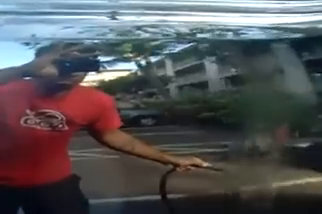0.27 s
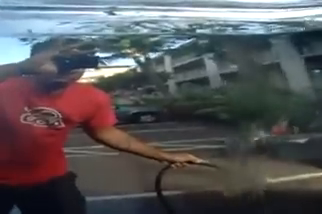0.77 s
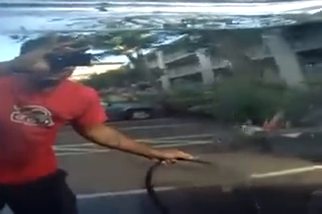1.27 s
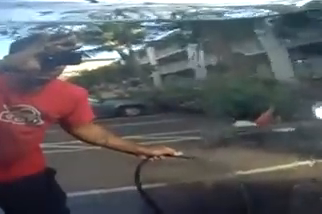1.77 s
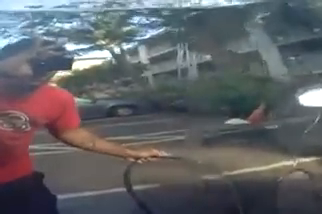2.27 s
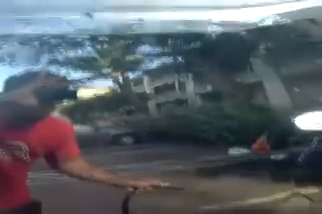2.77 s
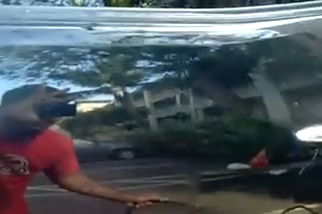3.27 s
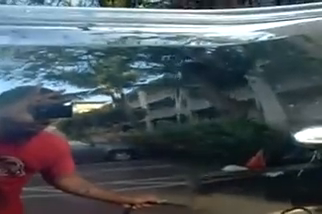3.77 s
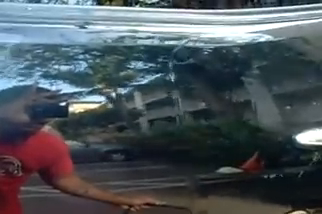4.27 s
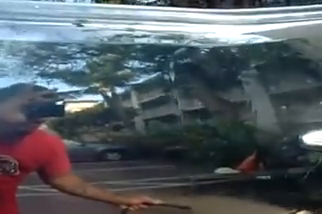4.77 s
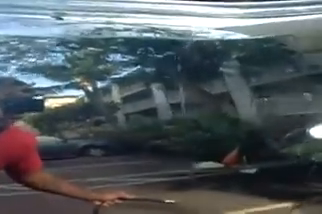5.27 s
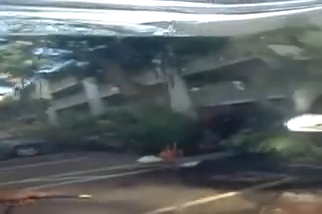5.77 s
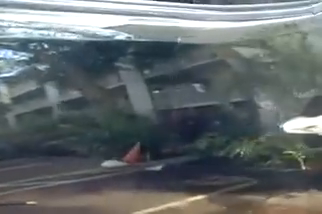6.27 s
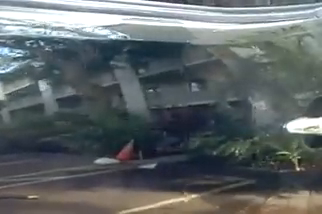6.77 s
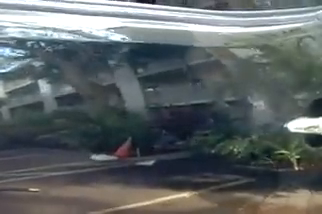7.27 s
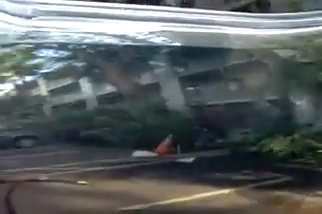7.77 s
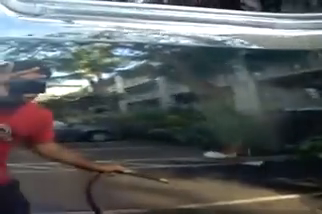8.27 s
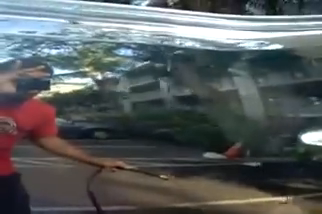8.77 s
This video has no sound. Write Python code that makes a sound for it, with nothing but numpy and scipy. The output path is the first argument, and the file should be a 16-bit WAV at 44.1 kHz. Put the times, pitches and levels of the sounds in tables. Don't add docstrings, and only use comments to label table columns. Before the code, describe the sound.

Fat water drops splat and plink crisply on wet asphalt beside a car panel, thinning midway then returning harder, over faint far traffic and wind thumps.

```python
import sys
import numpy as np
from scipy import signal
from scipy.fft import rfft, irfft, next_fast_len
from scipy.io import wavfile
from scipy.ndimage import map_coordinates

SR = 44100
rng = np.random.default_rng(int(sys.argv[2]) if len(sys.argv) > 2 else 0)


def field_ratio(decibels):
    return 10 ** (np.asarray(decibels, dtype=float) / 20)


def store_pcm(level_fs):
    pcm = np.round(np.clip(level_fs, -1, 1) * 32767).astype(np.int16)
    wavfile.write(sys.argv[1], SR, np.atleast_2d(pcm).T)


N = 397341

# (time [s], rumble level [dB], tyre roar level [dB])
TRAFFIC_LEVELS = [
    (0.0, -37.5, -40),
    (0.45, -44.5, -42.5),
    (4.44, -40.5, -43),
    (7.0, -43.5, -40),
    (7.58, -39, -41),
    (9.01, -41, -42),
]
# (frequency [Hz], level [dB])
TOWN_SPECTRUM = [(13, -41.5), (22, 0), (118, -0.5), (144, -4.5), (283, -6), (306, -5.5), (412, -6.5),
                 (966, -15.5), (1300, -20), (2500, -33), (3250, -41), (5500, -120)]
# (frequency [Hz], level [dB], half width [Hz])
PLANT_HUM = [
    (119.8, -49.5, 5.7),
    (174.7, -49.5, 4.5),
]
# (time [s], half length [s], frequency [Hz], width [Hz], level [dB])
PASSING_VEHICLES = [
    (.3, 0.71, 550, 39.4, -46),
    (3.053, 0.24, 680, 510, -45.5),
    (5.772, 0.17, 177, 24.7, -42),
    (6.7, 0.16, 460, 25, -48),
    (7.313, 0.34, 895, 302, -48),
    (3.054, .25, 980, 70, -55),
    (3.11, 0.23, 740, 59.6, -46.5),
]
# (time of peak [s], level [dB], pitch [Hz], swell [dB/s], fade [dB/s])
MOTOR_WHINES = [
    (.9, -51, 328, 12, 13),
    (6.699, -39, 343.4, 7.5, 34),
    (7.22, -49.5, 345, 50, 26.0),
]
# (time [s], half length [s], level [dB])
WIND_GUSTS = [
    (0.0, .03, -27),
    (0.16, 0.049, -29),
    (0.34, .05, -32),
    (7.154, 0.43, -40.5),
    (7.735, 0.32, -36),
    (8.218, 0.13, -38.5),
    (8.573, 0.15, -41),
    (8.92, 0.23, -47),
]
# (time [s], level [dB], pitch [Hz])
WIND_BUFFETS = [(.001, -21, 193), (.009, -15, 314), (.11, -26, 122), (0.132, -13.5, 150),
                (.146, -15.5, 232), (0.165, -14, 215), (.172, -20.5, 141), (0.317, -22.5, 190),
                (0.328, -23.5, 119), (7.543, -18, 160), (7.65, -30, 140), (7.746, -26, 155),
                (7.826, -15, 116), (7.875, -24, 160), (8.171, -21, 105), (8.319, -24.5, 120),
                (8.581, -25.5, 100)]
# (time [s], patter level [dB], jet hiss level [dB])
WATER_FLOW = [(0.0, -48.5, -59), (0.55, -50, -65), (0.85, -53, -62.5), (1.3, -47, -58),
              (1.58, -47.5, -60.5), (2.25, -52.5, -60), (2.5, -55, -72), (3.81, -54, -69), (4.04, -59, -73),
              (5.0, -66, -70), (5.29, -51.5, -62), (5.75, -57.5, -70.5), (6.0, -56, -61.5), (7.3, -50, -68),
              (8.1, -52, -59.5), (8.5, -56, -59), (8.66, -50.5, -62), (9.01, -50, -59)]
# (frequency [Hz], level [dB])
JET_SPECTRUM = [(880, -46), (1500, -4.5), (2040, -4.5), (3120, -2.5), (3580, -8), (3880, -3), (4460, -7.5),
                (8330, -32), (10500, -56.5), (13600, -67), (22000, -120)]
# (time [s], delay [ms])
DOOR_DELAY = [(0, 1.03), (.7, 1.02), (1.2, 1.11), (1.9, 1.13), (2.6, 1.28), (3.6, 1.28), (5, 1.19),
              (6, 1.18), (6.3, 1.25), (6.9, 1.21), (7.6, 1.29), (8.4, 1.24), (9.01, 1.28)]
# (time [s], length [s], start pitch [Hz], end pitch [Hz], level [dB])
PUDDLE_TRICKLES = [
    (6.42, .08, 4700, 4600, -45),
    (6.48, .09, 3400, 3700, -44),
    (6.94, .07, 3400, 3900, -44),
    (8.0, .05, 3800, 4000, -41),
    (8.16, .05, 4700, 4500, -43),
    (8.215, .08, 3700, 3250, -41),
]
# (time [s], peak level
# [dB], cavity pitch [Hz], ring [cycles])
FAT_RUNOFF_DROPS = [(0.0807, -21.5, 3420, 7.5), (0.1562, -23, 4220, 14), (0.3252, -24.5, 3900, 14),
                    (0.3399, -19, 3060, 20), (0.3534, -20.5, 3060, 17), (0.468, -24.5, 3900, 15),
                    (0.6564, -19, 3030, 6.3), (0.6731, -13.5, 2540, 4.7), (0.6983, -23.5, 3080, 11),
                    (0.9584, -22.5, 3500, 14), (0.9823, -17.5, 3740, 15), (1.0186, -16, 3470, 9.7),
                    (1.04, -15, 2800, 11), (1.067, -12, 2750, 5.7), (1.1772, -20, 3900, 18),
                    (1.3543, -24.5, 3970, 18), (1.4076, -19.5, 3430, 8), (1.49, -20.5, 3300, 12),
                    (1.5833, -23, 3900, 19), (1.6245, -22.5, 3400, 19), (1.6575, -11, 1660, 4.7),
                    (1.6814, -17.5, 3920, 12), (1.7275, -19.5, 3460, 9.8), (1.777, -19, 3560, 26),
                    (1.8412, -20.5, 3550, 10), (1.8654, -12, 3880, 7.1), (1.9148, -17.5, 3500, 12),
                    (1.9838, -23, 3540, 14), (1.9969, -21.5, 2410, 5.1), (2.014, -18.5, 4300, 12),
                    (2.11, -27, 3960, 13), (2.2044, -19, 3200, 6.5), (2.246, -24, 3380, 6.2), (2.275, -27, 3470, 8.9),
         (2.587, -28.5, 4060, 8.1), (3.4355, -30.5, 3180, 4.3), (3.689, -31.5, 4000, 11),
         (4.358, -28, 3980, 13), (4.4388, -30.5, 3200, 13), (4.559, -28.5, 4230, 8.3),
         (4.6785, -31, 3410, 14), (4.8526, -33.5, 1640, 17), (4.8836, -35.5, 2010, 31),
         (4.9105, -31, 3400, 11), (5.1316, -19.5, 1950, 5.9), (5.1754, -29.5, 3360, 11),
         (5.4119, -20, 1850, 5.4), (5.45, -22.5, 2600, 8.7), (5.5453, -27, 4040, 11),
         (5.6466, -23, 4200, 11), (5.8165, -24.5, 3430, 11), (5.8504, -27.5, 4250, 12),
         (5.891, -24.5, 4420, 6.4), (5.9567, -16, 2580, 5.9), (5.999, -30, 2730, 13),
         (6.0481, -14.5, 3800, 5.3), (6.123, -28.5, 2900, 8.4), (6.1714, -23, 3400, 5),
         (6.35, -24, 3180, 7.3), (6.4295, -22.5, 1960, 7.7),
                    (6.5846, -18, 3300, 6.1), (6.6372, -15.5, 2220, 5.1), (6.762, -20.5, 2480, 4),
                      (6.8374, -13.5, 1820, 13), (6.935, -18, 4120, 9.8), (6.9815, -18, 4070, 6.9),
                      (7.0523, -17.5, 2540, 15), (7.196, -25.5, 3800, 16), (7.2328, -23.5, 2340, 9),
                      (7.3103, -15.5, 2480, 11), (7.3218, -18, 2530, 9.1), (7.4624, -28, 3950, 12),
                      (7.499, -7.5, 3730, 4.1), (7.5983, -18, 2660, 12), (7.669, -16.5, 3300, 8.2),
                      (7.6856, -7, 1800, 4.4), (7.7614, -19.5, 4150, 7.2), (7.7764, -20, 3380, 7.5),
                      (7.8372, -17, 3340, 9.1), (7.8458, -17.5, 2520, 14), (7.8733, -16, 3230, 8.5),
                      (7.9042, -24, 3100, 15), (7.9347, -20, 4100, 10), (7.9845, -13, 2650, 6.3),
                      (8.2084, -17.5, 3400, 8.4), (8.3315, -11, 3250, 5.8), (8.3499, -18, 4000, 15),
                      (8.6194, -23, 4600, 19), (8.641, -22, 3800, 10), (8.8577, -19.5, 1670, 4.1)]
# (time [s], peak level [dB], cavity pitch [Hz])
FOLLOWER_DROPS = [(0.061, -26, 3740), (0.0944, -23.5, 3630), (0.4417, -25.5, 3890), (0.5075, -32, 4300),
                  (1.086, -21, 2350), (1.1686, -24, 3900), (1.2336, -28.5, 3460), (1.275, -27.5, 3700),
                  (1.3417, -25, 3900), (1.4714, -23.5, 3440), (1.555, -23, 3680), (1.6073, -27, 3300),
                  (1.7118, -22.5, 3570), (5.1034, -31, 1650), (5.1537, -31, 2340), (5.5522, -31.5, 3450),
                  (5.873, -28.5, 2450), (6.5165, -26.5, 2750), (6.9234, -24.5, 2400), (7.1072, -23, 3110),
                  (7.1536, -25, 2400), (7.1654, -35, 4100), (7.3314, -36, 2650), (7.422, -25.5, 3970),
                  (7.4745, -24, 3900), (8.3184, -22, 3320), (8.5958, -26, 4070), (8.656, -22, 3580),
                  (8.6774, -30, 3200), (8.9331, -21, 3830)]


def in_time(rows):
    s, *columns = np.transpose(rows)
    return [np.interp(np.arange(N) / SR, s, column) for column in columns]


def rms_one(x):
    return x / np.sqrt(np.mean(x ** 2) + 1e-20)


def drift(rate_hz):
    step = 40
    r = np.exp(-2 * np.pi * step * rate_hz / SR)
    slow = signal.lfilter([1], [1, -2 * r, r * r], rng.standard_normal(N // step + 2002))[2000:]
    return np.interp(np.arange(N) / step, np.arange(len(slow)), rms_one(slow))


def coloured(spectrum):
    hz, db = np.transpose(spectrum)
    size = next_fast_len(N)
    grid_hz = np.maximum(np.arange(size // 2 + 1) * SR / size, 1)
    gain = field_ratio(np.interp(np.log(grid_hz), np.log(hz), db))
    return rms_one(irfft(rfft(rng.standard_normal(size)) * gain, size)[:N])


def butter(x, hz, kind, order=2):
    return signal.sosfilt(signal.butter(order, hz, kind, fs=SR, output="sos"), x)


def lay(at_s, shapes):
    where = np.round(at_s * SR).astype(int)[:, None] + np.arange(shapes.shape[1])
    return np.bincount(np.clip(where, 0, N).ravel(), shapes.ravel(), N + 1)[:N]


def town():
    rumble_db, roar_db = in_time(TRAFFIC_LEVELS)
    far = coloured(TOWN_SPECTRUM)
    rumble = butter(far, 560, "low")
    out = field_ratio(rumble_db + 1.5) * rms_one(rumble) + field_ratio(roar_db + 3.0) * rms_one(far - rumble)
    for hz, db, width in PLANT_HUM:
        hum = butter(rng.standard_normal(N), [hz - width, hz + width], "band", order=1)
        out += field_ratio(db) * rms_one(hum)
    return out


def passing():
    t, out = np.arange(N) / SR, 0
    for s, half, hz, width, db in PASSING_VEHICLES:
        band = butter(rng.standard_normal(N), [hz - width / 2, hz + width / 2], "band")
        out = out + field_ratio(db) * rms_one(band) * np.exp(-((t - s) / half) ** 2)
    return out


def motors():
    rise_hz_per_s, top_s = 2.2, 0.48
    out = 0
    for s, db, hz, swell, fade in MOTOR_WHINES:
        t = np.arange(N) / SR - s
        slope = np.where(t < 0, swell, fade)
        loss_db = slope * (np.hypot(t, top_s) - top_s) * (1 + abs(t) / 2)
        pitch_hz = hz + rise_hz_per_s * t + 1.8 * drift(6.7)
        level = np.sqrt(2) * field_ratio(db - loss_db + 0.8 * drift(7))
        out = out + level * np.sin(2 * np.pi * np.cumsum(pitch_hz) / SR)
    return out


def wind():
    t = np.arange(N) / SR
    level = sum(field_ratio(db) * np.exp(-((t - s) / half) ** 2) for s, half, db in WIND_GUSTS)
    low_noise = butter(butter(rng.standard_normal(N), 145, "low"), 54, "high")
    lumps = low_noise * field_ratio(7.2 * drift(30))
    s, db, hz = np.transpose(WIND_BUFFETS)
    turns = hz[:, None] * np.arange(1600) / SR
    push = -np.sin(2 * np.pi * turns) * np.exp(-((turns - 0.9) / 0.6) ** 2)
    return level * rms_one(lumps) + lay(s, field_ratio(db)[:, None] * push)


def jet(db):
    flutter = field_ratio(2.26 * drift(23) + 0.24 * drift(17.0))
    hiss = field_ratio(db + 9.5) * coloured(JET_SPECTRUM) * flutter
    delay = in_time(DOOR_DELAY)[0] * SR / 1000
    return hiss + field_ratio(-20) * map_coordinates(hiss, [np.arange(N) - delay], order=3)


def splat(at_s, db, hz, cycles, spread_ms, count, rise=0.018):
    turns = hz[:, None] * np.arange(count) / SR
    closing = (0.06 + 0.33 * rng.random(len(at_s)) ** 2) * (hz / 3500) ** 0.6
    ring = -np.cos(2 * np.pi * turns * (1 + rise * turns) + 0.12)
    decay = np.exp(-np.log(1000) * turns / cycles[:, None])
    onset = 1 - np.exp(-(turns + 0.037) / closing[:, None])
    shape = field_ratio(db)[:, None] * ring * decay * onset
    mirror_ms = np.interp(at_s, *np.transpose(DOOR_DELAY)) + spread_ms * rng.standard_normal(len(at_s))
    return lay(at_s, shape) + field_ratio(2.44) * lay(at_s + mirror_ms / 1000, shape)


def trickles():
    out = 0
    for s, length, start_hz, end_hz, db in PUDDLE_TRICKLES:
        when, pitch = rng.random((2, 40))
        hz = (start_hz + (end_hz - start_hz) * when) * (0.97 + 0.04 * (pitch - 0.5))
        cycles = np.full(len(hz), 60.0)
        out = out + splat(s + length * when, db - 5 * when, hz, cycles, spread_ms=0.2, count=800, rise=0.005)
    return out


def patter(db, per_s, largest=4.36, cycles=4.9, low_hz=2900):
    born = np.flatnonzero(rng.random(N) < per_s * field_ratio(3.0 * drift(18)) / SR)
    size, pitch, ring = rng.random((N, 3))[born].T
    size_db = 4.6 * np.minimum(-np.log(size + 1e-9), largest)
    hz = low_hz * 2 ** (0.83 * pitch)
    drops = splat(born / SR, size_db, hz, 1.5 + cycles * ring, spread_ms=0.042, count=240)
    return field_ratio(db) * rms_one(drops)


def scatter(x, t60, level_db):
    t = np.arange(2200) / SR
    out = x.copy()
    for spot in range(4):
        taps = rng.standard_normal(len(t)) * np.exp(-np.log(1000) * t / t60) * (t > 0.001)
        taps /= np.sqrt(np.sum(taps ** 2))
        out += field_ratio(level_db - 9) * signal.fftconvolve(x * drift(5.5), taps)[:N]
    return out


def fat_drops():
    follower_ring_s = 0.0032
    followers = [(s, db, hz, hz * follower_ring_s) for s, db, hz in FOLLOWER_DROPS]
    drops = [*FAT_RUNOFF_DROPS, *followers]
    s, db, hz, cycles = np.transpose(drops)
    cycles = np.clip(cycles, 2, 35)
    db = db + 0.87 + 15 / cycles
    droplets = 12
    late, size, pitch = rng.random((len(s), 3, droplets)).transpose(1, 0, 2)
    crown_s = s[:, None] + 0.001201 + 0.018 * late ** 2.6
    crown_db = db[:, None] - 9.5 - 17 * late - 8 * size
    crown_hz = np.minimum(hz[:, None] * 2 ** (1.1 * pitch - 0.1), 9000)
    crown_cycles = np.repeat(cycles, droplets)
    crown = splat(crown_s.ravel(), crown_db.ravel(), crown_hz.ravel(), crown_cycles, spread_ms=0.11, count=300)
    return splat(s + 0.00015, db + 0.5, hz, cycles, spread_ms=0.028, count=500) + crown


def scene():
    patter_db, hiss_db = in_time(WATER_FLOW)
    strays = dict(per_s=60, largest=0.99, cycles=19.0)
    drops = fat_drops() + patter(patter_db + 0.5, **strays)
    drops += patter(patter_db - 3.0, per_s=120, largest=3.4)
    water = scatter(drops, t60=0.089, level_db=-6.5)
    water += patter(patter_db - 6.5, per_s=660, largest=2.4) + trickles()
    water += patter(patter_db - 8.5, per_s=110, largest=2.6, cycles=11.0, low_hz=4100)
    near = butter(butter(water, 1100, "high", order=1), 4430, "low") + jet(hiss_db)
    return (near + town() + passing() + motors() + wind())[None]


def band_limit(x):
    return signal.sosfilt(signal.butter(12, 10610, fs=SR, output="sos"), x)


def record(dry):
    clip_top = 0.49
    rounded = clip_top * np.tanh(dry / clip_top)
    mix = butter(rounded, 9610, "low", order=12)
    return band_limit(mix)


dry = scene()
out = record(dry)
store_pcm(out)
```